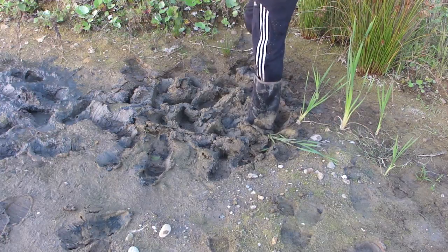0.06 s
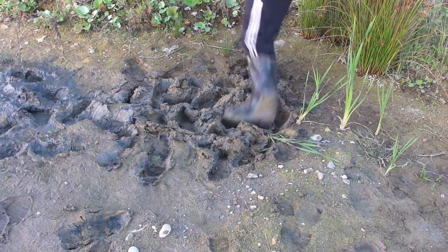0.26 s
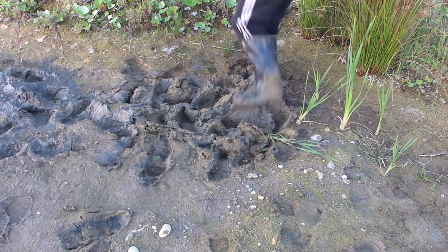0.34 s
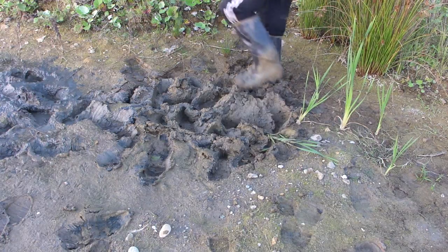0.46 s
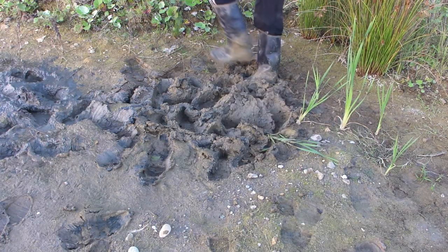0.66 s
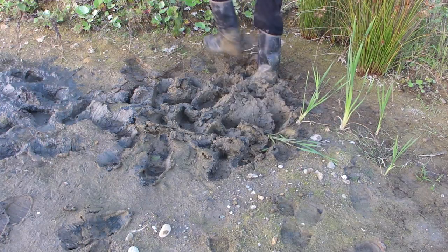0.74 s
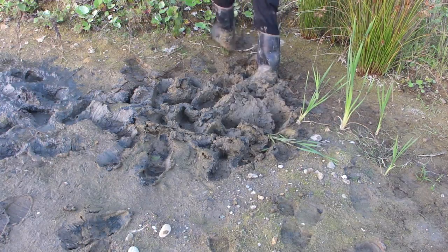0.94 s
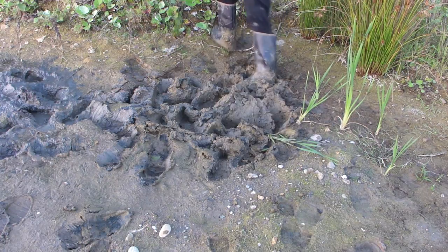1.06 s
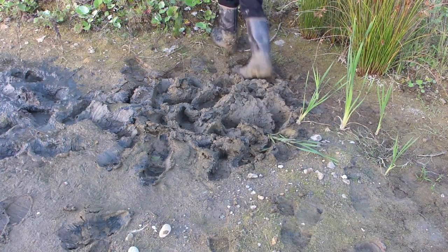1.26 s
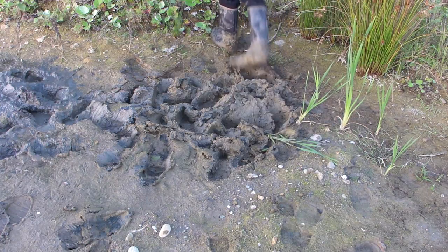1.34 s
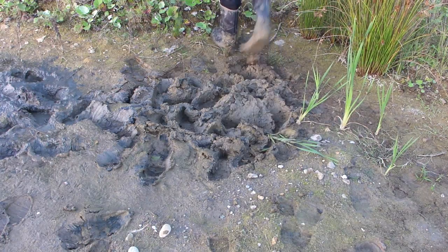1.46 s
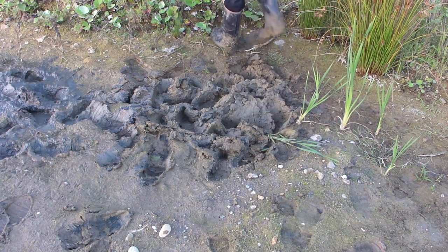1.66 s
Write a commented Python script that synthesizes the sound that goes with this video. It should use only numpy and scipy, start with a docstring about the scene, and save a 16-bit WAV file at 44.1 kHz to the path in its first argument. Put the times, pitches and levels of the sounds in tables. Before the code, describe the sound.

Two squelching pulls of rubber boots from sticky mud, crackling and popping, in light outdoor wind.

```python
"""A fine wet crackle swells into pops and a plop, twice: rubber boots pull out of thick mud outdoors.
Tearing mud radiates small impulses, opening air pockets ring as damped oscillators, and the hollow
under the boot sounds its normal modes when the suction breaks. One soft footfall lands between
the pulls. The boots are a few metres away, over faint distant wind."""
import sys
import numpy as np
from scipy import signal
from scipy.fft import rfft, irfft
from scipy.io import wavfile

SR = 44100
rng = np.random.default_rng(int(sys.argv[2]) if len(sys.argv) > 2 else 0)


def file_out(sig):
    """Save sig as 16-bit WAV at sys.argv[1]."""
    # one column per channel
    cols = np.atleast_2d(sig).T
    # limit, then scale
    lim = np.clip(cols, -1, 1)
    pcm = np.round(lim * 32767).astype(np.int16)
    wavfile.write(sys.argv[1], SR, pcm)


N = 74970
T = np.arange(N) / SR


def undb(db):
    """Amplitude ratio of a level in decibels."""
    return 10 ** (np.asarray(db) / 20)


def unit(x):
    """Normalisation to rms 1."""
    return x / np.sqrt(np.mean(x ** 2) + 1e-20)


def add(out, t, x):
    """Superposition: x joins out from time t on."""
    i = int(np.clip(round(t * SR), 0, N - 1))
    out[i:i + len(x)] += x[:N - i]


def decay(t60):
    """Exponential decay, followed until it is 90 dB down."""
    return undb(-60 * T[:int(1.5 * t60 * SR) + 8] / t60)


def ring(hz, t60, rise_s=0.00056):
    """Damped harmonic oscillation with a rapid onset."""
    env = decay(t60)
    t = T[:len(env)]
    return env * (1 - np.exp(-t / rise_s)) * np.sin(2 * np.pi * hz * t)


def colour(x, points):
    """Spectral shaping by a curve of (f/Hz, gain/dB) points."""
    hz, db = np.array(points, float).T
    f = np.maximum(np.fft.rfftfreq(N, 1 / SR), 1)
    return irfft(rfft(x) * undb(np.interp(np.log(f), np.log(hz), db)), N)


def wander(per_s):
    """Random modulation with a standard deviation near 1."""
    knots = rng.standard_normal(size=2048)
    return 1.2 * np.interp(T * per_s, np.arange(len(knots)), knots)


# air pockets opening, plus one high squeak at 0.247 s: t/s, f/Hz, level/dB, T60/s, level of the hollow/dB
AIR_POCKETS = [(0.1947, 780, -16, 0.0077, -41), (0.1995, 2570, -21, .014, -52),
               (0.2038, 2400, -31, 0.014, -47), (0.2108, 750, -24, 0.024, -49),
               (0.2145, 2170, -19.5, 0.02, -29), (0.2215, 704, -26.5, 0.014, -49),
               (0.2295, 980, -21.5, 0.014, -32.5), (0.2312, 2600, -27, .012, -48),
               (0.2325, 1658, -22.5, 0.033, -42), (0.2372, 794, -25.5, 0.019, -24),
               (0.247, 5750, -23, 0.018, -60), (0.2903, 1974, -24, 0.028, -36),
               (0.3135, 1890, -26.5, 0.0082, -66), (0.5128, 1880, -30.5, 0.0085, -48),
               (0.9442, 1720, -34, 0.0062, -60), (0.9735, 1490, -35, 0.028, -46),
               (1.1650, 1520, -7, 0.0052, -35.5), (1.1700, 1405, -29, 0.025, -56),
               (1.2044, 1710, -6.5, 0.0043, -31), (1.2110, 1500, -17.5, 0.012, -47),
               (1.2160, 1780, -25, 0.015, -48), (1.239, 1913, -10, 0.01, -25.5),
               (1.2552, 885, -40, 0.011, -64), (1.3440, 1780, -36, 0.027, -51),
               (1.4925, 1890, -27.5, 0.0072, -62)]
def pops():
    """Impulse excitation: each opening air pocket, and the one brief squeak, rings and excites the hollow under
    the boot."""
    out = np.zeros(N)
    hollow = ring(hz=457, t60=0.037)
    for t, hz, db, t60, hollow_db in AIR_POCKETS:
        add(out, t, undb(db) * ring(hz, t60))
        add(out, t, undb(hollow_db) * hollow)
    return out


# suction breaking: t/s, base level/dB, base f/Hz, gain of the upper modes/dB, base T60/s
SUCTION_BREAKS = [(0.249, -8.5, 462.7, 1, 0.042), (1.2109, -13, 518, -23, 0.029)]
# modes of the hollow: f/base f, relative level/dB, T60/base T60
HOLLOW_MODES = [(1, -1.5, 0.99), (0.66, -10.5, 0.39), (1.45, -15, 0.65), (1.94, 3, 0.76), (2.8, -15, 1),
                (3.8, -3, 0.23)]
def suction():
    """Cavity resonance: air breaks into the hollow under the sole, whose modes sum to a round plop."""
    out = np.zeros(N)
    for t, db, hz, upper_db, t60 in SUCTION_BREAKS:
        for k, (hz_ratio, mode_db, t60_ratio) in enumerate(HOLLOW_MODES):
            amplitude = undb(db + mode_db + (upper_db if k > 1 else 0))
            polarity = 1 if k else -1
            add(out, t, polarity * amplitude * ring(hz * hz_ratio, t60 * t60_ratio))
    return out


# films of mud bursting: t/s, relative level/dB, centre f/Hz, bandwidth of one filter pass/Hz
MUD_FILMS = [(0.0090, -47, 9500, 4030), (0.051, -44.5, 9300, 6000), (0.1080, -35, 5850, 6000),
             (0.148, -33.5, 7600, 5000), (0.1652, -36, 7000, 4000), (0.1802, -23.5, 7200, 2500),
             (0.1853, -26, 6650, 3500), (0.1985, -27, 5900, 1500), (0.2304, -25, 8000, 7000),
             (0.2448, -21, 8600, 2980), (0.2850, -28, 6900, 4960), (0.319, -32, 7300, 6000),
             (0.3864, -39, 7450, 4000), (0.4062, -30.5, 7530, 4000), (0.427, -35, 7500, 4000),
             (0.4397, -36, 7160, 4000), (0.4899, -38, 6000, 4000), (0.8688, -47, 6500, 4000),
             (1.0808, -34, 7300, 5000), (1.1008, -29, 6460, 8000), (1.1252, -33.5, 7100, 4000),
             (1.1884, -29.5, 6200, 2500), (1.2010, -31, 6800, 1800), (1.2050, -29, 6940, 4000),
             (1.212, -16, 7940, 7150), (1.216, -23, 7500, 4000), (1.239, -32.5, 6000, 3500),
             (1.272, -36, 6800, 4000), (1.2872, -35.5, 6750, 4000), (1.2898, -35, 6900, 4000),
             (1.323, -40, 7000, 5000), (1.3441, -35, 7040, 7000), (1.3720, -42.5, 8030, 4000)]
def snaps():
    """Resonant filtering of a noise burst: each wet film breaks with a brief, bright spit."""
    out, env = np.zeros(N), decay(t60=0.01)
    burst = env * (1 - np.exp(-T[:len(env)] / 0.00042))
    for t, db, hz, width in MUD_FILMS:
        spit = rng.standard_normal(size=2048)[:len(env)] * burst
        b, a = signal.iirpeak(hz, hz / width, fs=SR)
        spit = signal.lfilter(b, a, signal.lfilter(b, a, spit))
        spit *= np.sqrt(np.sum(env ** 2) / np.sum(spit ** 2))  # equal energy at any bandwidth
        add(out, t, undb(db - 5.5) * spit)
    return out


# envelope of the crackle: t/s, level/dB
CRACKLE_ENVELOPE = [(0, -82), (0.06, -66), (0.085, -53), (0.135, -54.5), (0.175, -50), (0.195, -41),
                    (0.222, -46), (0.233, -36), (0.249, -32), (0.257, -41), (0.275, -51.5), (0.295, -46),
                    (0.375, -58), (0.40, -54), (0.44, -59), (0.52, -73), (0.84, -82), (0.89, -65),
                    (0.935, -65.5), (0.962, -48.5), (0.995, -62.5), (1.06, -60.5), (1.09, -52),
                    (1.147, -58.5), (1.167, -41.5), (1.195, -47), (1.23, -48), (1.30, -55.5), (1.37, -60.5),
                    (1.42, -71), (1.7, -85)]
# spectrum of the crackle: f/Hz, relative level/dB
CRACKLE_SPECTRUM = [(200, -14), (900, -2), (2200, 6.5), (3200, -5), (5000, -5), (6000, 3), (8500, 2.5),
                    (10500, -1), (13000, -19)]
def crackle(clicks_per_s=4000, spread_db=3.5, flurry_db=2.5):
    """Shot noise: tiny wet clicks of unequal size arrive at random, in quick flurries."""
    sizes = undb(spread_db * np.minimum(rng.exponential(size=N), 4))
    signs = rng.choice([-1, 1], N)
    arrivals = rng.random(N) < clicks_per_s / SR
    clicks = sizes * signs * arrivals * undb(flurry_db * wander(per_s=250))
    level_db = np.interp(T, *np.array(CRACKLE_ENVELOPE).T)
    return unit(colour(clicks, CRACKLE_SPECTRUM)) * undb(level_db)


# mud tearing from the boot: t/s, duration/s, level/dB, f of the smallest bubbles/Hz
BUBBLE_SWARMS = [(0.187, 0.023, -35.5, 3100), (0.212, 0.019, -39, 2650), (0.229, 0.015, -30.5, 3110),
                 (0.266, .05, -53, 2730), (0.386, .06, -51.5, 2510), (0.955, .025, -55, 2350),
                 (1.094, .055, -51.5, 2380), (1.154, .025, -38.5, 2180), (1.203, .05, -41.5, 2340)]
def tearing(bubbles_per_s=1500, low_hz=407, t60_cycles=9.2):
    """Bubble resonance: swarms of small bubbles open as the mud lets go, the smallest ringing highest."""
    out = np.zeros(N)
    for start, duration, db, high_hz in BUBBLE_SWARMS:
        swarm = np.zeros(N)
        bubbles = rng.random((200, 3))[:int(duration * bubbles_per_s)]
        for k, (jitter, pitch, strength) in enumerate(bubbles):
            t = start + duration * (k + jitter) / len(bubbles)
            hz = low_hz * (high_hz / low_hz) ** pitch
            chance_db = -2 * np.log(1 - strength)  # exponentially distributed
            treble_tilt = undb(2.56 * np.log2(hz / low_hz)) * np.sqrt(hz)
            add(swarm, t, undb(chance_db) * treble_tilt * ring(hz, t60_cycles / hz))
        out += undb(db) * unit(swarm) * np.sqrt(duration * SR / N)
    return out


# thuds of the sole: t/s, f/Hz, level/dB, T60/s
SOLE_THUDS = [(0.1900, 263, -35, 0.047), (0.237, 271, -31.5, 0.047), (0.9514, 270, -29, 0.032),
              (1.2103, 207, -25, 0.03)]
def thuds():
    """Soft impact: weight shifting onto yielding ground excites a low, quickly damped oscillation."""
    out = np.zeros(N)
    for t, hz, db, t60 in SOLE_THUDS:
        add(out, t, undb(db) * ring(hz, t60, rise_s=0.0022))
    return out


def scattering(x, gain_db=-18, delay_s=0.004):
    """Diffuse scattering: ground and plants return a faint short tail, different at each ear."""
    env = decay(t60=0.17)
    tails = rng.standard_normal((2, N))[:, :len(env)] * env * (T[:len(env)] > delay_s)
    tails = [tail / np.sqrt(np.sum(tail ** 2)) for tail in tails]
    return undb(gain_db) * np.array([signal.fftconvolve(x, tail)[:N] for tail in tails])


# background rush, a soft midrange filtered away near 3-4 kHz, faint hiss above: f/Hz, relative level/dB
RUSH_SPECTRUM = [(30, -23), (70, -11), (140, -15.5), (240, -11), (350, -10), (550, -7), (750, -5.5),
                 (910, -0.5), (1500, -8.5), (2100, -18.5), (2550, -29.5), (3000, -39), (4300, -38),
                 (6000, -30), (8000, -30.5), (10500, -35.5), (13000, -52)]
# stereo width of the rush: f/Hz, level of side relative to mid/dB
RUSH_WIDTH = [(60, -3.5), (250, 0), (560, -4.5), (1100, -10), (2500, 1.5), (5000, 0.5), (11000, -3)]
def wind(level_db=-47, flicker_db=0.86, swell_db=0.22):
    """Amplitude-modulated noise: a soft far rush, least coherent between the ears in bass and treble."""
    mid, side = (unit(colour(rng.standard_normal(N), RUSH_SPECTRUM))
                 * undb(flicker_db * wander(per_s=14.12)) for _ in range(2))
    side = colour(side, RUSH_WIDTH)
    return np.array([mid + side, mid - side]) * undb(level_db - swell_db * wander(per_s=2.2))


def scene(left_lead_db=1.6, side_db=-8.5):
    """Interaural cues: boots and wind lean slightly left; an independent side signal widens the spray."""
    body = pops() + suction() + thuds() + tearing()
    spray = crackle() + snaps()
    side = undb(side_db) * (crackle() + snaps())
    wide_spray = np.array([spray + side, spray - side])
    pan = undb(np.array([[left_lead_db], [-left_lead_db]]) / 2)
    return pan * (body + wind()) + wide_spray + scattering(body + spray)


# the camera's notch filters, cutting narrow bands near 3, 4 and 5 kHz: f/Hz, bandwidth/Hz
CAMERA_NOTCHES = [(3000, 447), (4050, 930), (5030, 800)]
def record(dry, low_cut_hz=181, notch_depth=0.95, roll_off_hz=10640, top_hz=15000):
    """Filter cascade: the camera cuts the bass and three bands; a steep low-pass dulls the top treble."""
    x = signal.sosfilt(signal.butter(2, low_cut_hz, "highpass", fs=SR, output="sos"), dry)
    for hz, width in CAMERA_NOTCHES:
        notched = signal.lfilter(*signal.iirnotch(hz, hz / width, fs=SR), x)
        x = x + notch_depth * (notched - x)
    x = signal.sosfilt(signal.butter(8, roll_off_hz, fs=SR, output="sos"), x)
    return signal.sosfilt(signal.ellip(8, 0.2, 70, top_hz, fs=SR, output="sos"), x)


dry = scene()
out = record(dry)
file_out(out)
```